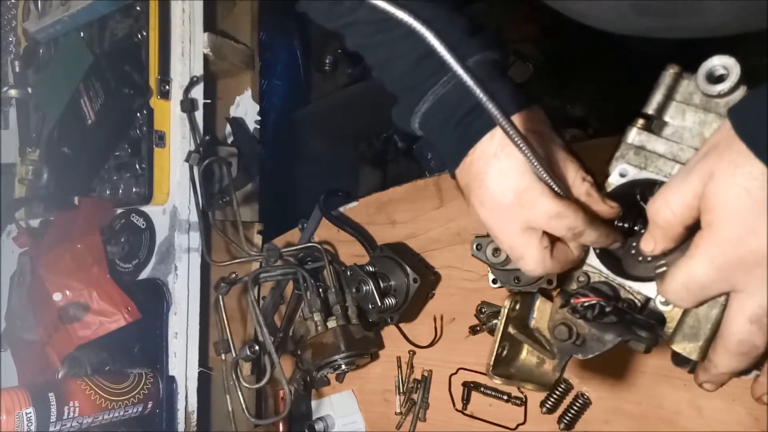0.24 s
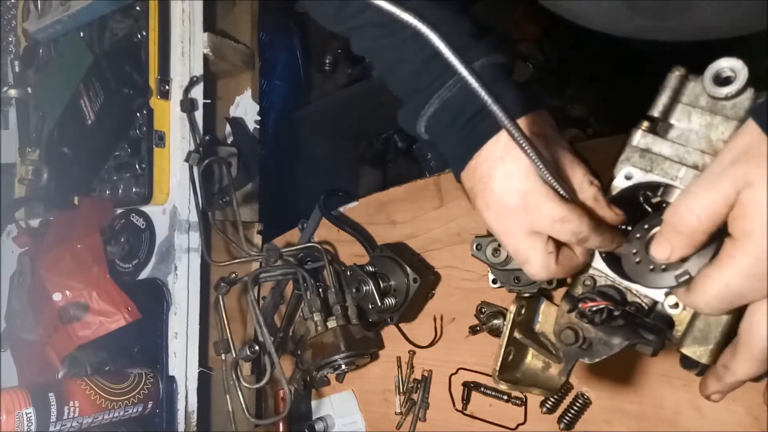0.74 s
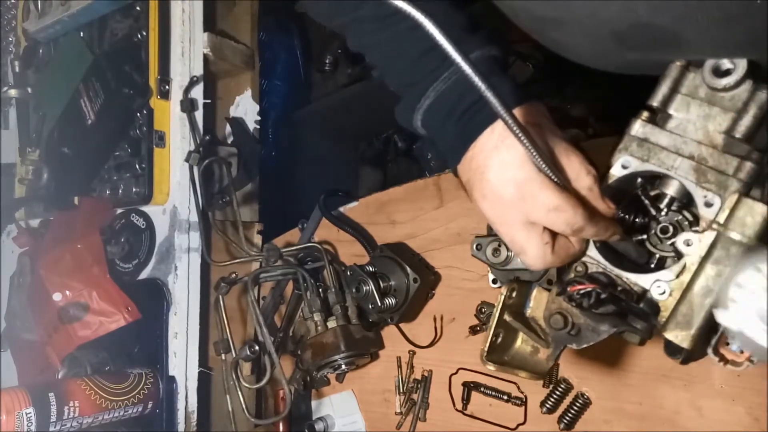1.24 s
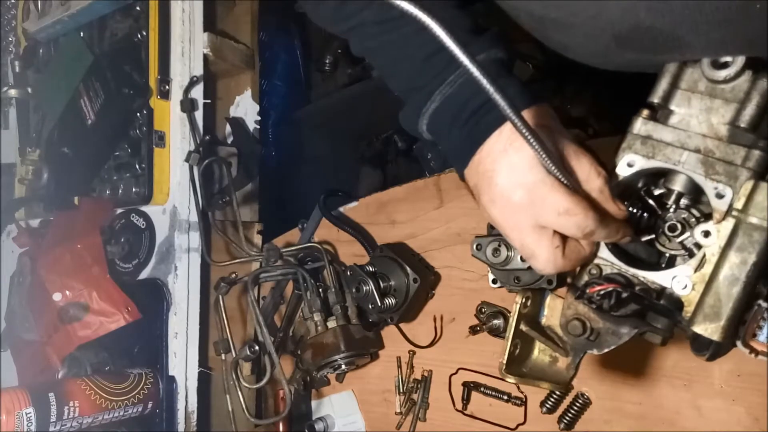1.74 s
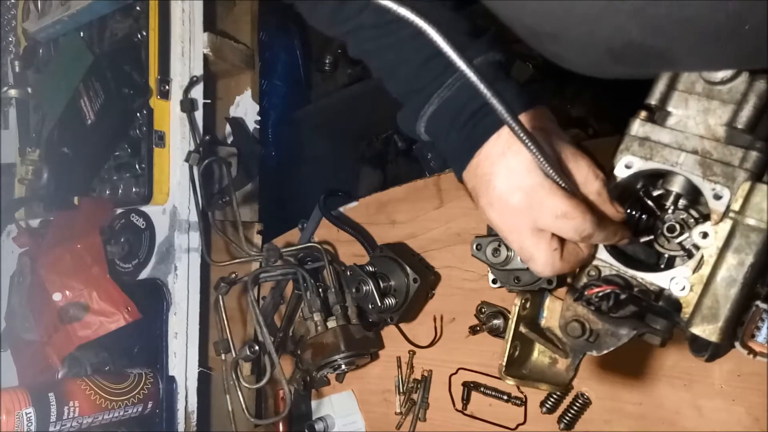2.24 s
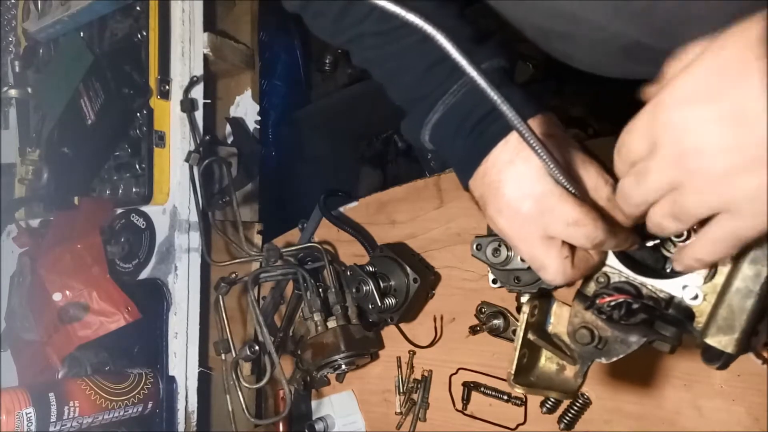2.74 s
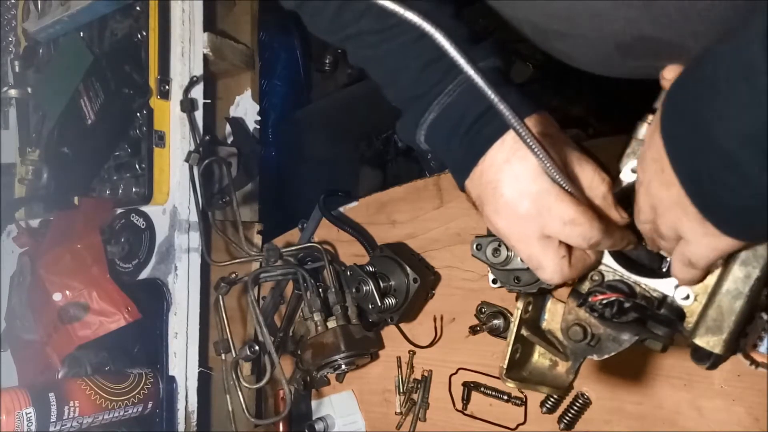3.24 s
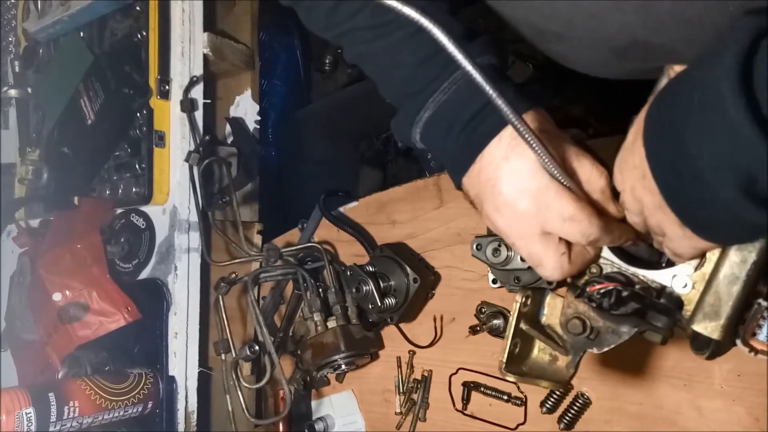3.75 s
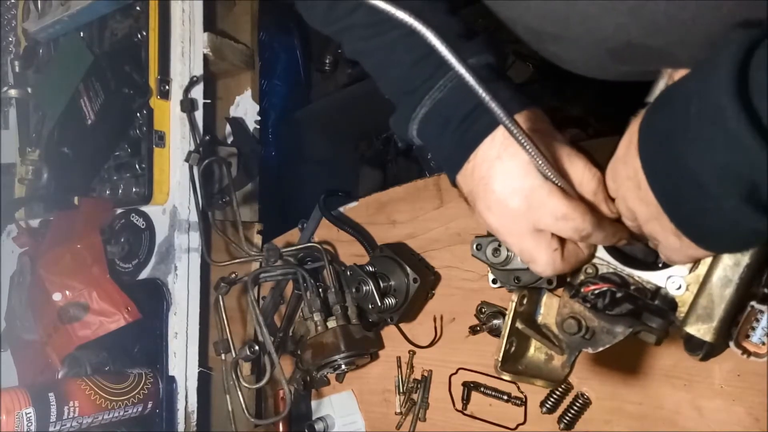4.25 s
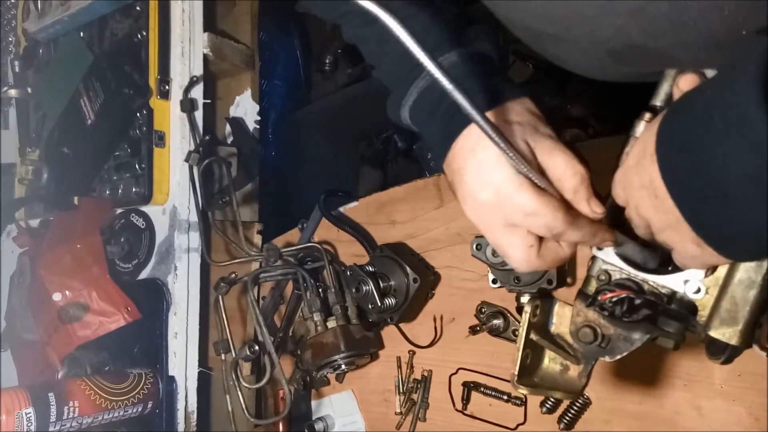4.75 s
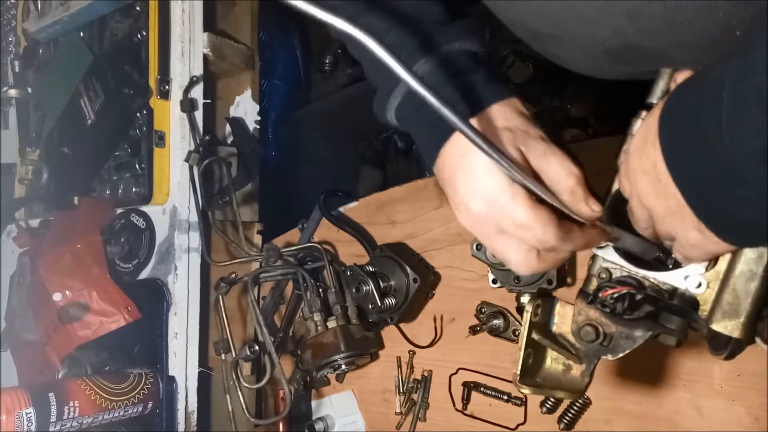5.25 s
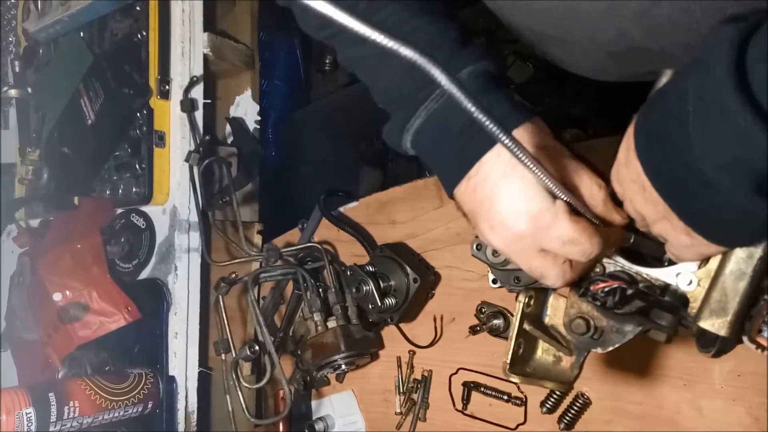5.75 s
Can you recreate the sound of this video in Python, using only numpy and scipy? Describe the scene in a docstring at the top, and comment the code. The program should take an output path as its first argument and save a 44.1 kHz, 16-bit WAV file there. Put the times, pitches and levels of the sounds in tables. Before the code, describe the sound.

In a quiet workshop, close to a small stereo microphone, faint scuffs sit over hiss and a wavering low hum. A metal cover squeals thinly along a wooden bench, drops and rattles to rest in quick knocks. Afterwards come faint scrapes and sparse bright ticks as a tool touches small steel parts in a housing, ending with one strong clack.

```python
"""A quiet workshop, close to a small stereo microphone. Filtered-noise hiss, room tone and a wavering hum lie
underneath; band-passed scuffs come first, then a metal cover squeals along the bench as fuzzy gliding tones.
The cover lands near 2.3 s and rocks to rest, each blow a cluster of decaying sines with a noise crack.
Later a pick-up tool clicks against parts inside a pump housing, ringing small steel parts and the housing."""
import sys
import numpy as np
from scipy import signal
from scipy.io import wavfile
from scipy.ndimage import uniform_filter1d

SR = 44100
rng = np.random.default_rng(int(sys.argv[2]) if len(sys.argv) > 2 else 0)


def persist_wave(psi):
    """Save psi, clipped to +-1, as 16-bit WAV."""
    counts = np.round(np.clip(psi, -1, 1) * 32767).astype(np.int16)
    wavfile.write(sys.argv[1], SR, np.atleast_2d(counts).T)


N = 265041


def amp(db):
    """Decibels to gain."""
    return 10 ** (np.asarray(db, float) / 20)


def evened(x):
    """Scales to rms 1."""
    return x / np.sqrt(np.mean(x ** 2) + 1e-20)


def drift(shape, size):
    """Random unevenness of rms 1, smoothed over size samples."""
    return evened(uniform_filter1d(rng.standard_normal(shape), size=size))


def over_time(points, s):
    """Reads a (start_s, value) table on a straight time axis."""
    return np.interp(s, *np.transpose(points))


def read(points, hz):
    """Reads a (pitch_hz, value) table on a log-frequency axis."""
    f, value = np.transpose(points)
    return np.interp(np.log(hz + 1), np.log(f + 1), value)


def add(mix, s, sound, pan_db=0):
    """Places a sound, one or two channels, in the stereo mix; positive pan_db makes the left louder."""
    sound = sound * amp([[pan_db / 2], [-pan_db / 2]])
    part = mix[:, round(s * SR):][:, :sound.shape[1]]
    part += sound[:, :part.shape[1]]


def ring(modes, t, spread_db, flips=0.42):
    """Decaying sines; every blow stirs each mode by a different amount, a share of them upside down."""
    hz, db, t60 = np.transpose(modes)[:, :, None]
    stir_db = spread_db * rng.standard_normal(hz.shape)
    side = np.where(rng.random(hz.shape) < flips, -1., 1.)
    decay = amp(db + stir_db - 60 * t / t60)
    return (side * decay * np.sin(2 * np.pi * hz * t)).sum(0)


def noise(shape_db, same, patchy_db, size=1024):
    """Stereo noise from random short-time spectra; shape_db(hz, s) gives the level, with random level patches."""
    hop = size // 4
    frames, hz = N // hop + 5, np.fft.rfftfreq(size, 1 / SR)[:, None]
    a, b, c, d, patches = rng.standard_normal((frames, len(hz), 5)).T
    patches = uniform_filter1d(patches, size=7, axis=0)  # across pitch
    patches = evened(uniform_filter1d(patches, size=14, axis=1))  # across time
    left = a + 1j * b
    right = same * left + np.sqrt(1 - same ** 2) * (c + 1j * d)
    level_db = shape_db(hz, np.arange(frames) * hop / SR) + patchy_db * patches
    spectra = np.array([left, right]) * amp(level_db)
    return evened(signal.istft(spectra, nperseg=size, noverlap=size - hop)[1][:, :N])


def whistle(hz, width_hz, same, steady=0):
    """Slow complex chance on a carrier: a tone of uncertain pitch and height, partly its own in each channel."""
    r = np.exp(-np.pi * width_hz / SR)
    z = rng.standard_normal((len(hz) + 4000, 4)).T
    z = signal.lfilter([1], [1, -2 * r, r * r], z[:2] + 1j * z[2:])[:, 4000:]  # skips the filter's start
    z[1] = same * z[0] + np.sqrt(1 - same ** 2) * z[1]
    z = z / np.sqrt(np.mean(abs(z) ** 2)) + steady
    carrier = np.exp(2j * np.pi * np.cumsum(hz) / SR)
    return evened((z * carrier).real)


def hum_and_rumble():
    """Four fuzzy hum lines waver over low noise; the rumble follows part of the hum's swings."""
    # hum level over time: start_s, level_db [dB]
    hum_levels = [(0.0, -60), (0.63, -57.5), (0.75, -61), (0.84, -69.5), (0.96, -78.5), (1.02, -69.5),
                  (1.5, -72), (1.62, -82), (2.29, -84), (2.46, -42.5), (2.64, -51), (2.71, -60.5),
                  (3.38, -62), (3.62, -69), (3.9, -63.5), (4.38, -70), (4.72, -87.5), (5.59, -83),
                  (5.66, -63.5), (5.7, -62), (5.76, -69.5), (5.88, -63.5), (6.01, -88.5)]
    # hum lines: pitch_hz, width_hz, level_db [dB, relative], steady [steady tone against fuzz, ratio]
    hum_lines = [(125.4, 25, 1.5, 2.2), (168.3, 15, -4.5, 0.22), (211, 18, -18.5, .4),
                 (281.5, 16, -19.5, .4)]
    # rumble spectrum: pitch_hz, level_db [dB, relative]
    rumble_shape = [(20, -26), (40, -3.5), (80, 10), (150, 2), (300, -1), (450, -6), (700, -45.5)]
    rumble_db, follows = -67.5, 0.25  # mean level; share of the hum's swings in dB
    hum_db = over_time(hum_levels, np.arange(N) / SR)
    hum = sum(amp(db) * whistle(np.full(N, hz), width_hz, 0.88, steady)
              for hz, width_hz, db, steady in hum_lines)
    rumble = noise(lambda hz, _: read(rumble_shape, hz), 0.8, 2.6, size=2048)
    swing_db = follows * (hum_db - hum_db.mean())
    low = amp(hum_db) * hum + amp(rumble_db + swing_db) * rumble
    return low * amp([[2.5], [-2.5]])  # leans left


def swelling_hiss():
    """A noise band whose level swells and whose pitch slides up and down."""
    # level: start_s, level_db [dB]
    hiss_levels = [(0.0, -60), (0.62, -58), (0.82, -60), (1.05, -72), (1.27, -59.5), (1.42, -56),
                   (1.6, -64.5), (1.77, -71), (1.92, -64), (2.01, -69), (2.28, -54.5), (2.32, -42.5),
                   (2.6, -58.5), (2.86, -56), (3.57, -65.5), (4.08, -64), (4.52, -66), (5.64, -58),
                   (6.01, -72.5)]
    # pitch guide, followed by 0.69 of its distance in octaves from 4000 Hz: start_s, guide_hz
    pitch_guide = [(0.0, 4150), (0.1, 3826), (0.89, 4150), (1.02, 3140), (1.29, 4030), (1.52, 3780),
                   (1.61, 4330), (2.07, 3754), (2.11, 3170), (2.21, 4320), (2.38, 3540), (3.16, 4180),
                   (3.3, 3696), (3.68, 4410), (4.02, 3670), (4.07, 4470), (4.89, 3525), (5.27, 4216),
                   (5.59, 3724), (6.01, 4290)]
    # spectrum when the guide stands at 4000 Hz: pitch_hz, level_db [dB, relative]
    hiss_shape = [(2600, -22.5), (3200, -4.5), (4000, 3), (4700, -2), (5300, -13), (6100, -18),
                  (7000, -46.5)]

    def shape_db(hz, s):
        """Slides the spectrum along with the guide."""
        slide = (4000 / over_time(pitch_guide, s)) ** 0.69
        return read(hiss_shape, hz * slide)

    hiss = noise(shape_db, 0.0065, patchy_db=2.2)
    return amp(over_time(hiss_levels, np.arange(N) / SR)) * hiss


def room_tone():
    """Steady, nearly smooth noise with little in common between the channels."""
    # spectrum: pitch_hz, level_db [dB, relative]
    tone_shape = [(12, -38.5), (20, -5), (113, -15.5), (433, -16), (512, -7.5), (2260, -18.5), (2980, -19),
                  (3240, -42.5), (4410, -15.5), (5680, -13), (6900, -36.5), (14300, -34), (16000, -77)]
    return amp(-72) * noise(lambda hz, _: read(tone_shape, hz), 0.017, 0.41)


def scuffs():
    """Soft strokes: band-passed noise with a quick start, a gradual fade and small catches and slips."""
    # strokes: start_s, end_s, low_hz, high_hz, level_db [dB rms before the stroke's envelope]
    strokes = [(0.255, 0.476, 990, 2720, -53.5), (0.273, 0.47, 262, 580, -58.5),
               (0.59, 0.914, 2250, 2680, -64.5), (1.211, 1.612, 2370, 2660, -67),
               (1.716, 2.299, 5600, 6420, -66), (1.738, 2.308, 3700, 4500, -48),
               (2.812, 2.961, 4920, 6400, -60.5), (2.843, 3.27, 2240, 2770, -62),
               (3.191, 3.276, 1730, 2440, -62), (4.525, 4.797, 1530, 4600, -57),
               (4.795, 4.87, 1980, 4000, -63), (5.426, 5.623, 1500, 3400, -63),
               (5.582, 5.702, 1100, 2220, -59)]
    out = np.zeros((2, N))
    for s0, s1, lo_hz, hi_hz, db in strokes:
        grain = rng.standard_normal((round((s1 - s0) * SR), 2)).T
        band = signal.sosfilt(signal.butter(3, [lo_hz, hi_hz], "band", fs=SR, output="sos"), grain)
        u = np.linspace(0, 1, band.shape[1])
        stroke = np.minimum(u / 0.16, 1) * (1 - u ** 0.8)
        stroke *= amp(0.35 * drift(len(u), 300))  # catches and slips
        add(out, s0, amp(db) * evened(band) * stroke, 2.5)
    return out


def squeals():
    """Gliding tones of the rubbed metal, each a thin core within a fuzzy skirt, and faint whistles."""
    # glides: start_s, end_s, start_hz, end_hz, width_hz,
    # level_db [dB, core before unevenness and fades], pan_db [dB, left over right]
    glides = [(0.936, 1.2, 3306, 3176, 182, -67.5, 6.5), (1.599, 1.753, 4450, 4400, 21, -66, 2),
              (1.713, 1.931, 3080, 3184, 170, -56, 4.5), (1.705, 1.88, 3990, 4100, 45, -56, 6),
              (1.723, 1.847, 5620, 5540, 222.2, -69, 15), (1.793, 1.96, 4670, 4610, 40, -53, -1),
              (1.961, 2.123, 4670, 4610, 40.4, -59, -4), (1.846, 2.35, 3410, 3310, 150, -55.5, 4.5),
              (1.889, 2.014, 3780, 3783, 30.6, -46.5, 10), (2.003, 2.13, 3730, 3800, 90, -60, 13),
              (1.834, 1.971, 4510, 4300, 200, -60, 0), (1.997, 2.323, 3870, 3840, 368.5, -57.5, -0.5),
              (2.076, 2.298, 3080, 3157, 24.8, -49.5, 0), (2.086, 2.275, 6200, 6140, 45, -69, 16),
              (2.119, 2.321, 4560, 4510, 47, -48, 0.5), (1.818, 2.304, 6650, 6680, 98.7, -77.5, 11),
              (1.978, 2.304, 2420, 2390, 119, -81, -4), (1.742, 1.987, 3500, 3360, 130, -62, 10),
              (2.409, 2.585, 11800, 11670, 122, -83.5, 5.5), (2.853, 2.965, 722, 709, 57.7, -70.5, 13),
              (3.417, 3.536, 1547, 1520, 50, -67, 9), (3.527, 3.663, 1505, 1426, 50, -66, 10),
              (3.671, 3.91, 328.6, 325, 87, -62, 1.5), (3.727, 3.905, 697, 682, 59.4, -77, 19),
              (3.827, 3.95, 3250, 3220, 60, -71.5, 13), (4.473, 4.567, 735, 707, 46.3, -67.5, 15.5),
              (4.556, 4.695, 705, 677, 55, -64.5, 6), (4.578, 4.65, 850, 833, 141, -64.5, 3),
              (4.655, 4.715, 784, 760, 91, -65, 9), (4.832, 5.081, 1110, 1087, 121, -67, 8),
              (4.882, 5.042, 800, 777, 60, -76, 20), (5.248, 5.32, 4194, 4280, 105, -63, 6.5),
              (5.429, 5.578, 1110, 1125, 124, -63, 11), (5.465, 5.838, 410, 326.7, 43.8, -62.5, 1.5)]
    waver, catch_db = 0.016, 2.2  # wander as a share of the pitch (of 1200 Hz at most); unevenness, both rms
    steady, steady_hz = 1.1, 75  # narrow squeals hold a steady tone; it fades out around this width
    out = np.zeros((2, N))
    for s0, s1, hz0, hz1, width_hz, db, pan_db in glides:
        hz = np.linspace(hz0, hz1, round((s1 - s0) * SR))
        n = len(hz)
        hz = hz + waver * np.minimum(hz, 1200) * drift(n, 600)
        core = whistle(hz, width_hz, 0.13, steady * np.exp(-(width_hz / steady_hz) ** 2))
        skirt = amp(-15.0) * whistle(hz, 5 * width_hz, 0.1)
        level = amp(db + catch_db * drift(n, 600)) * signal.windows.tukey(n, .33)
        add(out, s0, level * (core + skirt), pan_db)
    return out


def clicks():
    """A tick rings the small parts nearest its brightness, the housing and its cavity, with a puff of high noise."""
    # ticks: start_s, parts_db [dB rms before the rise], housing_db, cavity_db [dB, ring at its start],
    # bright_hz [brightest pitch], focus_db [dB per octave, below zero counts as none],
    # air_db [dB rms before rise and decay], pan_db [dB, left over right]
    ticks = [(1.249, -71, -66, -81, 3500, 8, -44, 20), (3.2063, -76.5, -38, -78.5, 3780, 16, -83, 35),
             (3.6712, -99, -36, -60, 3580, -12, -58, 24), (3.701, -82, -41.5, -70, 3710, -5, -49.5, 11.5),
             (3.937, -52.5, -56, -76.5, 4300, 16.5, -24, 7.5), (3.975, -52, -63, -80, 3160, 35, -26.5, 10),
             (3.9835, -59.5, -71.5, -86, 4730, 24, -38, -21), (4.4805, -62, -68, -80, 4080, 27, -40, 8.5),
             (4.484, -48, -63, -66.5, 4000, 35, -22.5, 5.5), (4.517, -50, -63, -71, 5000, 24, -16.5, -5),
             (4.522, -53.5, -72, -78, 3900, 12, -21.5, 8.5), (4.527, -43, -64, -73, 4370, 17, -9.5, 4),
             (4.555, -63, -74, -81, 3000, 1, -48, -10), (4.571, -65, -58, -80, 2690, 12, -47, 9),
             (4.588, -46, -51, -67, 4900, 9, -14, 1), (4.663, -44, -36, -34.5, 3240, -3, -53, -1.5),
             (4.805, -57.5, -76, -42.5, 2223, 10, -47.5, 9), (4.809, -36.5, -75, -31.5, 2840, 19, -18, 3),
             (4.8135, -47, -77, -44, 2384, -3, -40, 11), (4.823, -56, -75, -62, 2800, 25, -52, 9),
             (4.832, -56, -75, -59, 2836, 15.5, -52, 6), (4.838, -71, -45.5, -47, 3420, 13, -50, 16),
             (5.0933, -47, -45, -53, 4070, 13, -20.5, 6.5), (5.434, -64, -70, -49, 3800, 13.5, -32.5, 10),
             (5.465, -65.5, -57, -42, 3720, 38.5, -44, 25), (5.582, -25.5, -7, -31.5, 3720, 2, -2, 5.5),
             (5.593, -40.5, -52, -47, 3810, 8, -40, -11), (5.621, -48, -58, -56, 3680, 14, -45, -1),
             (5.604, -39.5, -60, -57, 3750, 17, -37, -5), (5.8928, -62, -80, -60, 3930, 12, -49, 8)]
    # small steel parts: pitch_hz, level_db [dB, relative], t60_s
    steel_parts = [(1300, -9, .012), (1600, -6, .012), (1930, -4, .015), (2170, -2, .015), (2430, -4, .014),
                   (2650, -3, .012), (2900, -4, .014), (3120, -2, .014), (3350, -3, .015), (3720, -1, .014),
                   (4100, -4, .015), (4500, -4, .015), (4800, -5, .014), (5250, -8, .013),
                   (5700, -10, .012), (6200, -11, .012), (6700, -12, .012), (7500, -9, .012),
                   (8500, -9, .012)]
    low_focus = 1.6  # parts below the brightest pitch fall off this much faster than those above
    skirt_db = 11  # focus_db into this gives the octaves from the brightest pitch down to the low cut
    metal, bodies, t = np.zeros((2, N)), np.zeros((2, N)), np.arange(round(.15 * SR)) / SR
    air_band = signal.butter(6, [6500, 15000], "band", fs=SR, output="sos")
    tick_rise, body_rise = 1 - np.exp(-t / 0.0029), 1 - np.exp(-t / 0.0039)
    for s, db, housing_db, cavity_db, bright_hz, focus_db, air_db, pan_db in ticks:
        # each tick shifts every part's pitch a little at random
        shift = 1 + 0.015 * rng.standard_normal(len(steel_parts))
        near = []
        for (hz, level_db, t60), k in zip(steel_parts, shift):
            octaves = abs(np.log2(hz / bright_hz)) * (low_focus if hz < bright_hz else 1)
            near.append((hz * k, level_db - max(focus_db, 0) * octaves, t60))
        parts = np.array([ring(near, t, 1.2), ring(near, t, 1.2)])
        chatter = drift((2, len(t)), 8)  # loose contact roughens the ring
        low_hz = max(bright_hz * 2 ** (-skirt_db / max(focus_db, 1)), 1000)
        low_cut = signal.butter(4, low_hz, "high", fs=SR, output="sos")
        parts = signal.sosfilt(low_cut, parts * (1 + 0.75 * chatter))
        puff = evened(signal.sosfilt(air_band, rng.standard_normal((len(t), 2)).T))
        air = amp(air_db - 60 * t / 0.024) * puff
        add(metal, s, (amp(db) * evened(parts) + air) * tick_rise, pan_db)
        body = ring([(795, housing_db, .022), (1110, cavity_db, .037)], t, 0)  # housing, then cavity
        add(bodies, s, body * (1 + 0.16 * evened(chatter[0])) * body_rise, pan_db)
    return metal, bodies


def knocks():
    """Each blow rings the bench and adds a crack of decaying noise at its own level."""
    # cover landing and rocking, later bumps on the bench: start_s, thud_db [dB rms before the fast fade],
    # crack_db [dB rms before rise and decay], depth_db [dB lost per octave above 400 Hz]
    blows = [(2.3091, -28, -20, 5.5), (2.322, -34, -23, 10.5), (2.336, -36.5, -48.5, 14.5),
             (2.405, -31, -17.5, 0), (2.414, -43, -43.5, 12), (2.4307, -29, -19, 0), (2.446, -48, -51, -1),
             (2.462, -32, -21, -2.5), (2.491, -31.5, -30.5, 3.5), (2.506, -41.5, -34.5, -1),
             (2.518, -33, -39, 3.5), (2.528, -39.5, -32, 3), (2.537, -38, -40, 2.5), (2.551, -52, -33, 2),
             (2.571, -46, -32.5, 10), (3.215, -54, -63, 13), (3.679, -59.5, -51, 13),
             (5.592, -48, -46, 11.5), (5.607, -53.5, -55, 7), (5.631, -69, -52, 7), (5.674, -59, -57, 36)]
    # wooden bench top with the cover on it: pitch_hz, level_db [dB, relative], t60_s [before damping]
    bench_modes = [(103.4, -12, 0.2), (156, -19.5, 0.034), (199.9, -11.5, 0.32), (221.8, -2, 0.14),
                   (376, -16.5, 0.18), (440.5, 2.5, 0.11), (543.6, 12, 0.027), (516.6, -5.5, 0.11),
                   (600, -5.5, 0.07), (652, -11, 0.21), (854, 0, 0.076), (946, 3.5, 0.05), (1122, 3, 0.043),
                   (1221, 2, 0.021), (1380, -10, 0.033), (1723, -10.5, 0.091), (1990, -9.5, 0.056)]
    damping = 0.95  # a hand on the cover shortens each ring by this factor
    fade_s, fade_db_per_s = 2.556, 905  # thuds still ringing at this time fade out very fast
    out, t = np.zeros((2, N)), np.arange(round(.4 * SR)) / SR
    crack_band = signal.butter(1, [1000, 3500], "band", fs=SR, output="sos")
    for s, thud_db, crack_db, depth_db in blows:
        # each blow shifts every mode's pitch a little at random
        shift = 1 + 0.022 * rng.standard_normal(len(bench_modes))
        struck = [(hz * k, level_db - depth_db * np.log2(hz / 400), t60 * damping)
                  for (hz, level_db, t60), k in zip(bench_modes, shift)]
        thud = ring(struck, t, 2.0, flips=1) * (1 - np.exp(-t / .0014))
        thud *= 1 + 0.25 * drift(len(t), 150)  # the cover rattles as it rings
        crack = evened(signal.sosfilt(crack_band, rng.standard_normal((len(t), 2)).T))
        crack *= 1 - np.exp(-t / 0.0055)
        fade_db = -fade_db_per_s * np.maximum(s + t - fade_s, 0) * (s < fade_s)
        blow = amp(thud_db + fade_db) * evened(thud) + amp(crack_db - 60 * t / 0.053) * crack
        add(out, s, blow, 7.5)  # the bench sounds louder on the left
    out[0] = np.roll(out[0], 13)  # samples by which the left port hears the bench later
    return out


def room(x):
    """Sparse taps of random sign, each band dying at its own speed; the bass is alike at both ports."""
    # reverberation: pitch_hz, t60_s
    band_decay = [(100, 0.13), (230, 0.22), (500, 0.52), (1500, 0.47), (4000, 0.62), (8000, 0.36)]
    taps = np.zeros((2, SR))
    at = np.arange(300, SR - 20, 20) + rng.integers(0, 20, (2, (SR - 301) // 20))
    np.put_along_axis(taps, at, rng.choice([-1., 1.], at.shape), 1)
    hz, t, z = signal.stft(taps, SR, nperseg=512)
    same = np.exp(-(hz / 700) ** 2)[:, None]
    z[1] = same * z[0] + np.sqrt(1 - same ** 2) * z[1]
    decay = amp(-60 * t / read(band_decay, hz)[:, None])
    tail = signal.istft(z * decay, SR, nperseg=512)[1]
    tail = tail / np.linalg.norm(tail[0])
    wet = signal.fftconvolve(x.mean(0)[None], tail, axes=1)[:, :N]
    return wet * amp([[2.5], [-2.5]])


def coloured(x):
    """The microphone loses deep bass and falls steeply above its presence band; minimum phase, so no pre-echo."""
    # response to near hits: pitch_hz, level_db [dB]
    response = [(30, -13), (60, -19.5), (95, -6), (4500, -2.5), (6000, -10.5), (7500, -31), (9000, -42),
                (16000, -46.5)]
    log_gain = np.log(amp(read(response, abs(np.fft.fftfreq(8192, 1 / SR)))))
    taps = np.fft.ifft(np.exp(np.conj(signal.hilbert(log_gain)))).real[:4096]
    return signal.oaconvolve(x, taps[None], axes=1)[:, :N]


def scene():
    """Near hits with their echoes, over the rubbing and the background."""
    background = hum_and_rumble() + swelling_hiss() + room_tone()
    rubbing = scuffs() + squeals()
    metal, housing = clicks()
    bench = knocks()
    # random level changes blur the pitch of the clicks' echoes
    blur = evened(1 + 1.5 * drift(N, 60))
    # the housing's ring is sent more weakly to the echoes
    click_send = blur * metal + amp(-6) * housing
    echoes = room(amp(-6.5) * bench + amp(-6.0) * click_send)
    return coloured(bench + metal + housing + echoes) + rubbing + background


def record(dry):
    """The band limit: a steep low-pass at 15.6 kHz."""
    low_pass = signal.firwin(511, 15600, window=("kaiser", 9), fs=SR)
    return signal.oaconvolve(dry, low_pass[None], "same")


dry = scene()
out = record(dry)
persist_wave(out)
```